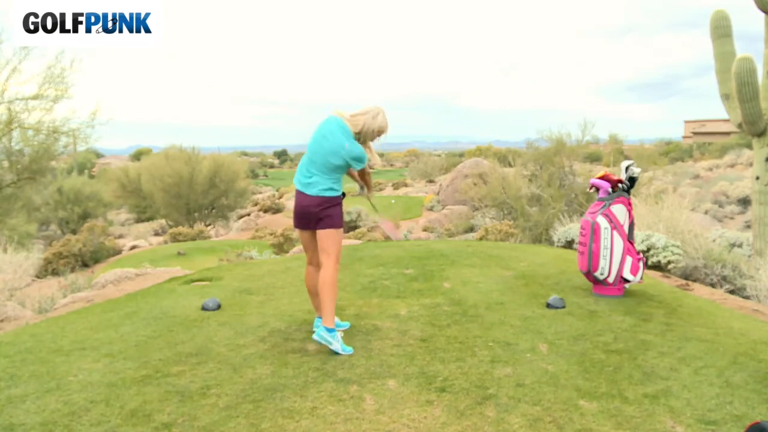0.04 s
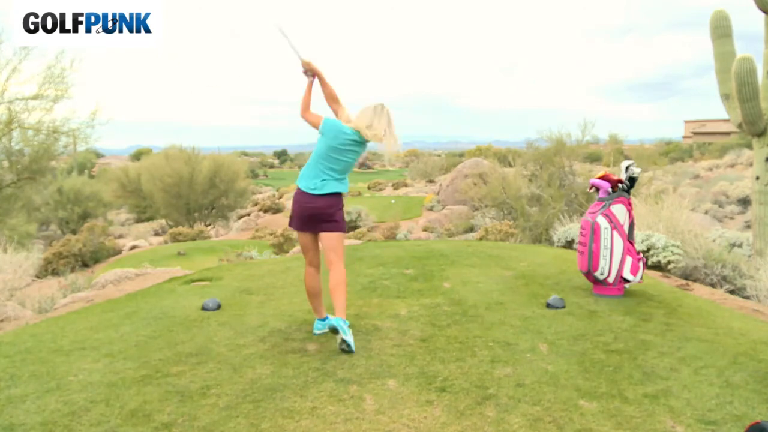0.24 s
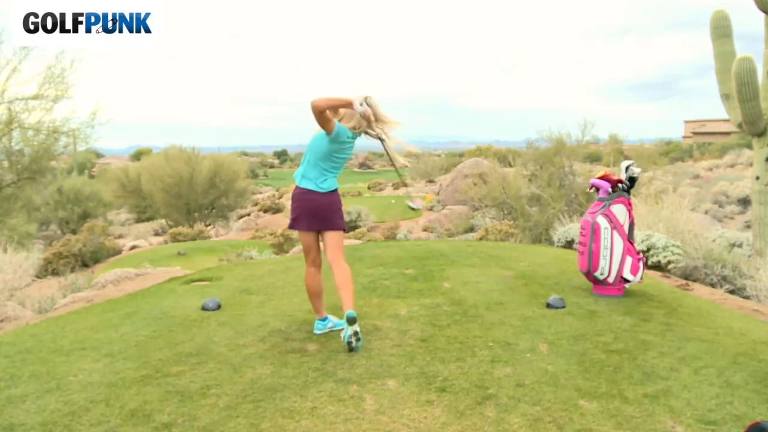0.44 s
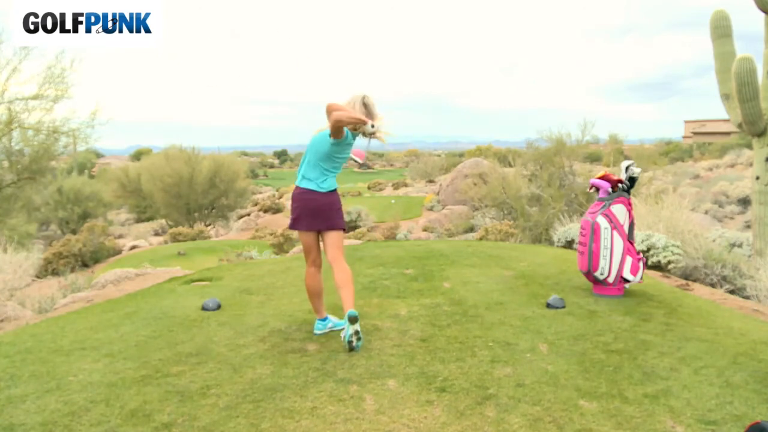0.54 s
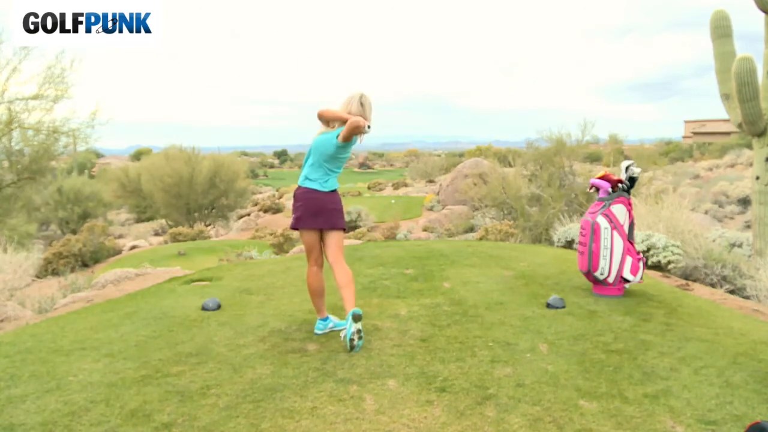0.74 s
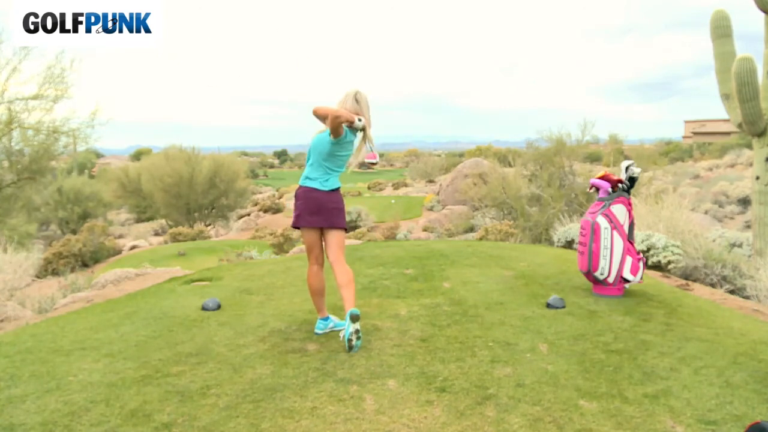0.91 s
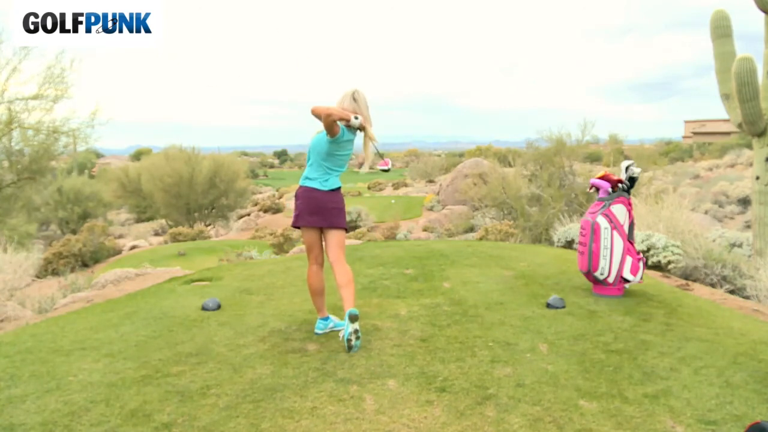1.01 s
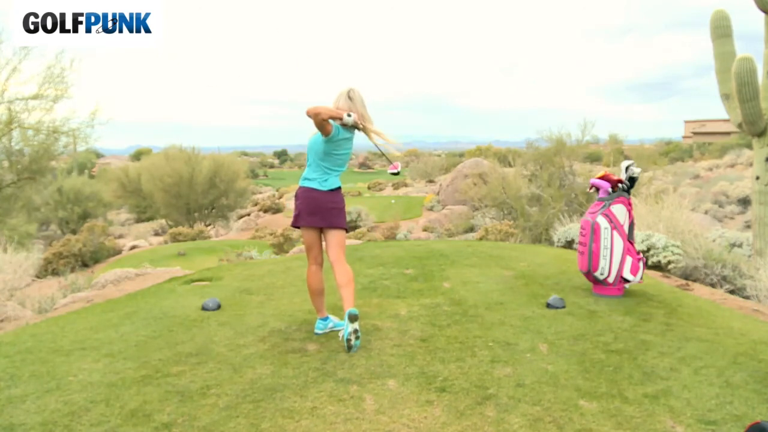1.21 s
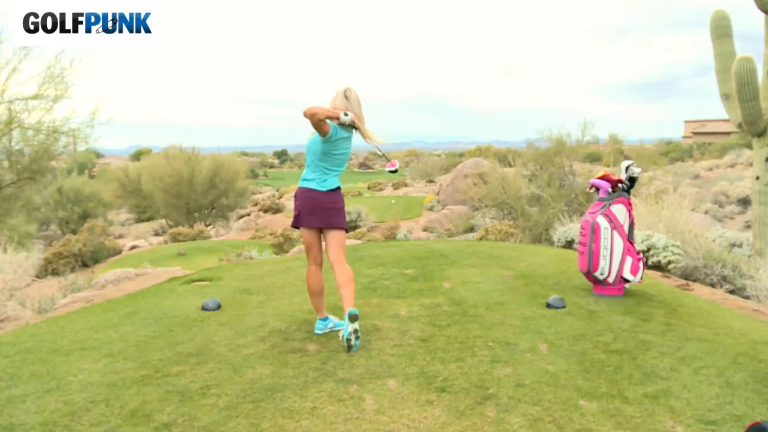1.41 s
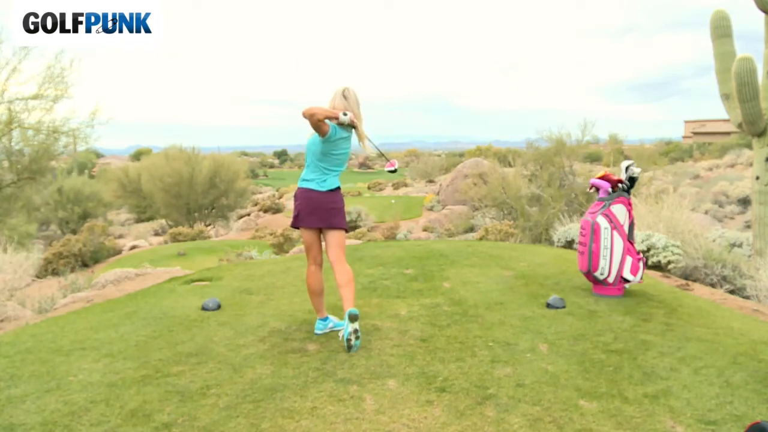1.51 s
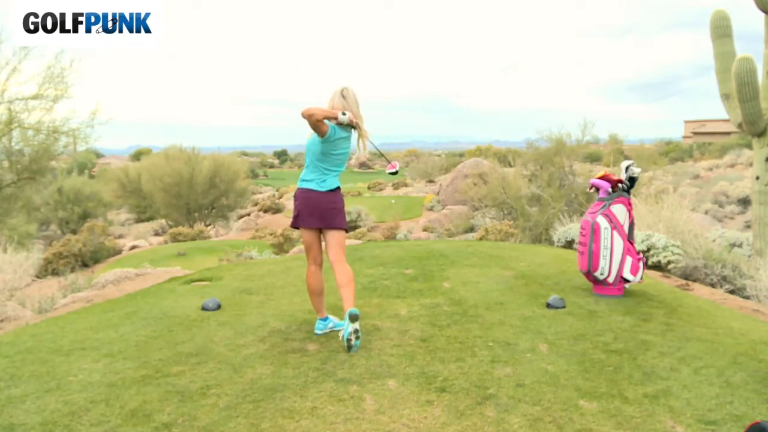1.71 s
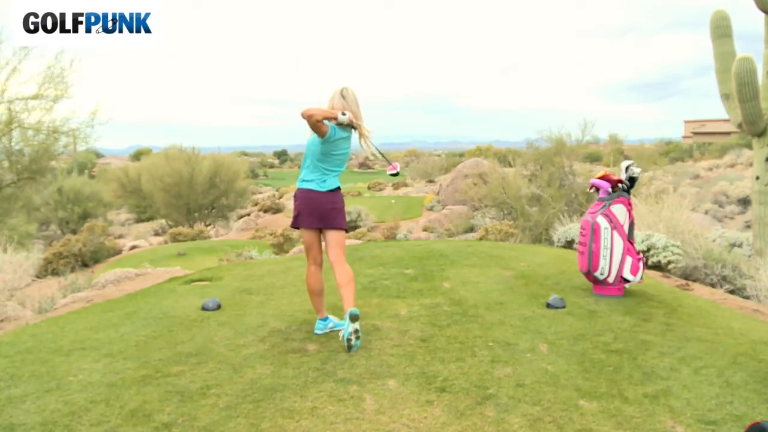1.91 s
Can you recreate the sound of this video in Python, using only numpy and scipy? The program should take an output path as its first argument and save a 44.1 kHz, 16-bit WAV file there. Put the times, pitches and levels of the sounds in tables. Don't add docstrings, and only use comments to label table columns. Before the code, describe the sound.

After a very short swing whoosh, a hollow metal driver cracks a ball on an open course, heard close from the player's clothing; fabric shakes and crackles softly, then faint distant rumble remains.

```python
import sys
import numpy as np
from scipy import signal
from scipy.io import wavfile
from scipy.ndimage import uniform_filter1d

SR = 44100
rng = np.random.default_rng(int(sys.argv[2]) if len(sys.argv) > 2 else 0)


def wav_out(sig):
    wavfile.write(sys.argv[1], SR, np.round(np.clip(np.atleast_2d(sig).T, -1, 1) * 32767).astype(np.int16))


def field_ratio(decibels):
    return 10 ** (np.asarray(decibels, dtype=float) / 20)


N = 85995
IMPACT_S = 0.0676

# t/s, low shake level/dB, cloth rustle level/dB
MOTION = [(0, -48, -60.5), (.02, -32.5, -56.5), (.05, -41.5, -58.5), (.064, -40.5, -54), (.1, -36.5, -52),
          (.128, -44, -58), (.15, -32, -58.5), (.2, -30, -64.5), (.235, -43, -63.5), (.26, -33.5, -62),
          (.285, -50.5, -66.5), (.38, -49.5, -69.5), (.46, -50, -70.5), (.53, -57, -72.5), (.61, -51, -71),
          (.7, -62.5, -74), (.9, -72, -77.5)]


def evened(x):
    return x / np.sqrt(np.mean(x ** 2) + 1e-20)


def add(mix, s, sound):
    part = mix[round(s * SR):][:len(sound)]
    part += sound[:len(part)]


def curve(table, order):
    rows = np.array(table)
    return np.interp(np.arange(N) / SR, rows[:, 0], rows[:, order])


def noise(shape, patchy_db=0.):
    frames, hz = N // 256 + 5, np.fft.rfftfreq(1024, 1 / SR)
    real, imag, patches = rng.standard_normal((frames, 513, 3)).T
    patches = uniform_filter1d(patches, size=10, axis=0)
    patches = evened(uniform_filter1d(patches, size=8, axis=1))
    f, db = np.transpose(shape)
    colour_db = np.interp(np.log(hz + 1), np.log(f + 1), db, left=-60)
    z = (real + 1j * imag) * field_ratio(colour_db[:, None] + patchy_db * patches)
    return evened(signal.istft(z, nperseg=1024, noverlap=768)[1][:N])


def resonate(x, hz, width_hz):
    turn = np.exp(2j * np.pi * np.cumsum(hz * np.ones(len(x))) / SR)
    r = np.exp(-np.pi * width_hz / SR)
    return 2 * (turn * signal.lfilter([1 - r], [1, -r], x / turn)).real


def blip(db, hz, cycles, sag):
    u = np.arange(0, 5 * cycles / hz, 1 / SR) * hz / cycles
    turns = cycles * np.log(1 + sag * u) / sag
    envelope = 2.03 * np.sqrt(2 * u) * np.exp(-1.7 * u)
    return -field_ratio(db) * envelope * np.sin(2 * np.pi * turns)


def cracks():
    # t/s, level/dB, f/Hz, length/cycles
    arrivals = [
        (0.0676, -9.5, 1173, 2),
        (.069, -19, 210, 0.93),
        (.0703, -16, 3200, 0.69),
        (.0712, -11.5, 562, 1.44),
        (0.0727, -17.5, 2586, 1.7),
        (0.0746, -16.5, 1420, 1),
        (.0766, -18, 1700, 1.4),
        (.104, -37.5, 1296, 2),
    ]
    out = np.zeros(N)
    for s, db, hz, cycles in arrivals:
        add(out, s, blip(db, hz, cycles, sag=0.14))
    return out


def turf_splash():
    level_db, hz, length_s = -20.5, 2704, .011
    out, t = np.zeros(N), np.arange(SR // 3) / SR
    grit = resonate(rng.standard_normal(len(t)), hz, 2600)
    grit = evened(resonate(grit, hz, 5000))
    arch = np.sin(np.pi * np.minimum(t / length_s, 1))
    add(out, IMPACT_S, field_ratio(level_db) * grit * np.sqrt(np.clip(arch, 0, 1)))
    return out


def face_flex():
    # f/Hz, level/dB
    modes = [(205, -24), (518, -18), (936, -19), (1091, -18), (1417, -18), (1690, -27)]
    length_s, t60_s = 0.015, 0.059
    out, t = np.zeros(N), np.arange(SR // 3) / SR
    gate = np.clip(np.minimum(t / .0045, (length_s - t) / 0.0054), 0, 1)
    thock = sum(field_ratio(db) * np.sin(2 * np.pi * hz * t) for hz, db in modes)
    add(out, IMPACT_S, gate * field_ratio(-60 * t / t60_s) * thock)
    return out


def head_ring():
    # f/Hz, level/dB, T60/s
    modes = [(3523.5, -7, 0.11), (3646, 1, .036), (4807, -8, 0.05), (5760, -10.5, 0.11), (5960, -7.5, .07),
             (6190, -4.5, 0.089), (6420, -5.5, .08), (6587, 1, 0.044), (6720, -2, 0.051), (7080, -8.5, .07),
             (7195, -4.5, .05), (8160, -5.5, .06), (8860, -9.5, .035), (9380, -9, 0.037)]
    # f/Hz, level/dB
    hiss_shape = [(2500, -24.5), (3100, -24.5), (3600, -10.5), (4400, -18), (5300, -18.5), (6300, -5),
                  (9700, -9), (15500, -23)]
    start_s, swell_s, hiss_t60_s = .0688, .0075, 0.065
    ring_db, hiss_db, ragged_db = -14, -18.5, 5
    out, t = np.zeros(N), np.arange(SR // 3) / SR
    swell = np.minimum(t / swell_s, 1)
    after = np.maximum(t - swell_s, 0)
    drift = rng.standard_normal((len(modes), len(t)))
    drift = evened(uniform_filter1d(drift, size=350, axis=1))
    ragged = field_ratio(ragged_db * np.minimum(after / 0.01, 1) * drift)
    ring = np.zeros(len(t))
    for (hz, db, t60), rag in zip(modes, ragged):
        p, q = rng.random(2)
        rise = swell ** (0.45 * hz / 4000)
        decay = field_ratio(db - 60 * after / t60) + field_ratio(db - 25 - 25 * after / t60)
        tone = np.sin(2 * np.pi * (hz * t + p))
        twin = 0.28 * np.sin(2 * np.pi * (1.012 * hz * t + q))
        ring += rag * rise * decay * (tone + twin)
    hiss = noise(hiss_shape)[:len(t)] * field_ratio(hiss_db - 60 * after / hiss_t60_s)
    add(out, start_s, field_ratio(ring_db) * ring / 2 + swell ** 0.72 * hiss)
    return out


def body_jolt():
    start_s, level_db, hz, t60_s = .0715, -7.5, 47.03, 0.055
    out, t = np.zeros(N), np.arange(SR // 3) / SR
    add(out, start_s, field_ratio(level_db - 60 * t / t60_s) * np.sin(2 * np.pi * hz * t))
    return out


def whoosh():
    # t/s, shed f/Hz, level/dB
    swing = [
        (0, 627, -42),
        (.012, 639, -39),
        (.026, 699.8, -41),
        (.045, 734.3, -34.5),
        (.064, 541, -27.5),
        (.085, 505, -40),
        (.11, 530, -45.5),
        (.135, 561, -43.5),
        (.15, 534, -63),
    ]
    width_hz, cap_db = 230, -30
    hz, air = curve(swing, order=1), rng.standard_normal(N)
    fuzz = evened(resonate(resonate(air, hz, width_hz), hz, 1.6 * width_hz))
    wobble = 1 + .05 * evened(uniform_filter1d(air, size=400))
    whistle = np.sin(2 * np.pi * np.cumsum(hz * wobble) / SR)
    fade = np.clip((.16 - np.arange(N) / SR) / 0.017, 0, 1)
    return (fuzz + whistle) * fade * field_ratio(np.minimum(curve(swing, order=2), cap_db))


def clothes():
    # f/Hz, level/dB per Hz
    shake = [(12, -32), (20, 3), (87, 6.5), (129, -9), (403, -23), (499, -27.5), (600, -28.5), (780, -53),
             (1320, -120)]
    # f/Hz, level/dB per Hz
    rustle = [(180, -25), (300, -1.5), (444, -8.5), (499, -10.5), (2230, -18), (3410, -22.5), (5920, -21.5),
              (9710, -22.5), (12600, -56), (21400, -120)]
    # t/s, level/dB, start f/Hz, length/cycles
    tugs = [(.1412, -31.5, 736, 1.2), (0.2048, -35, 503, 0.99), (.208, -23.5, 394, 1.66),
            (0.1392, -33.5, 108, 4.3), (0.341, -45, 350, 1), (0.3949, -40.5, 400, 1.5),
            (0.4201, -37.5, 480, 1.6), (0.4458, -44, 500, 1.74), (.4518, -37, 379.6, 1.95),
            (0.459, -36, 59.7, 0.72), (0.517, -53, 350, 1.5), (.541, -44.5, 358, 1.5),
            (0.5868, -40.5, 1010, 2), (0.596, -45.5, 610, 1.06), (0.773, -55.5, 500, 1.5),
            (1.337, -49, 900, 1.6), (1.366, -51, 498, 1.72)]
    # t/s, level/dB, f/Hz, length/cycles
    ticks = [
        (0.1421, -38.5, 1000, 1.3),
        (0.206, -46, 1300, 1),
        (0.595, -64, 4950, 2.4),
        (.3028, -38.5, 1510, 1.06),
        (.362, -47.5, 4000, 1.5),
        (0.5865, -42.5, 3370, 1.7),
        (0.5905, -33.5, 2580, 0.75),
        (0.5985, -48, 4500, 0.69),
        (.918, -60.5, 3000, 2.56),
        (0.954, -63, 6490, 2.06),
    ]
    # t/s, length/s, level/dB, centre f/Hz
    brushes = [
        (0.591, 0.01196, -58.5, 8500),
        (0.604, 0.0186, -58.5, 7400),
    ]
    calm = np.clip((.95 - np.arange(N) / SR) / .25, 0, 1)
    out = noise(shake) * field_ratio(curve(MOTION, order=1)) * calm
    out += noise(rustle, patchy_db=0.5) * field_ratio(curve(MOTION, order=2) + 8.5) * calm
    for s, db, hz, cycles in tugs:
        add(out, s, blip(db, hz, cycles, sag=1.0))
    for s, db, hz, cycles in ticks:
        add(out, s, -blip(db, hz, cycles, sag=0.14))
    for s, length, db, hz in brushes:
        t = np.arange(0, length, 1 / SR)
        brush = evened(resonate(rng.standard_normal(SR // 10), hz, 2700))[:len(t)]
        add(out, s, field_ratio(db) * brush * np.sin(np.pi * t / length))
    return out


def crackle():
    level_db, rate_per_s = -68, 240
    size = field_ratio(5 * np.minimum(rng.exponential(1, N), 3))
    size = size * (rng.random(N) < rate_per_s / SR)
    kind = rng.integers(0, 4, N)
    grains = np.zeros(N)
    for k, hz in enumerate((272, 480, 900, 1700)):
        grains += signal.oaconvolve(size * (kind == k), blip(level_db, hz, 0.96, sag=0.65))[:N]
    return grains * field_ratio(0.97 * (curve(MOTION, order=2) + 69.5))


def bird():
    # t/s, length/s, level/dB, start f/Hz, end f/Hz
    whistles = [
        (1.28, .07, -86, 9100, 9650),
        (1.68, .29, -86, 9160, 8140),
        (1.85, 0.022, -87.5, 9560, 9700),
    ]
    out = np.zeros(N)
    for s, length, db, from_hz, to_hz in whistles:
        u = np.arange(0, length, 1 / SR) / length
        hz = from_hz + (to_hz - from_hz) * u
        waver = field_ratio(2.2 * evened(uniform_filter1d(rng.standard_normal(len(u)), size=500)))
        tone = np.sin(2 * np.pi * np.cumsum(hz) / SR)
        add(out, s, field_ratio(db) * waver * np.sin(np.pi * u) ** 0.66 * tone)
    return out


def open_air():
    # f/Hz, level/dB
    floor_shape = [(20, -14), (66, 2.5), (160, -17), (330, -25), (730, -25), (1200, -33.5), (3000, -46.5),
                   (10000, -51)]
    return field_ratio(-54.5) * noise(floor_shape, patchy_db=1.2)


def scene():
    strike = cracks() + turf_splash() + face_flex() + head_ring() + body_jolt()
    return (strike + whoosh() + clothes() + crackle() + bird() + open_air())[None]


def top_cut(x):
    return signal.sosfilt(signal.butter(12, 15700, fs=SR, output="sos"), x)


def record(dry):
    edge_hz, leak_db = 9916, -25
    lowpass = signal.firwin(601, edge_hz, window=("kaiser", 7), fs=SR)
    low = signal.oaconvolve(dry, lowpass[None], "same")
    return top_cut(low + field_ratio(leak_db) * (dry - low))


dry = scene()
out = record(dry)
wav_out(out)
```